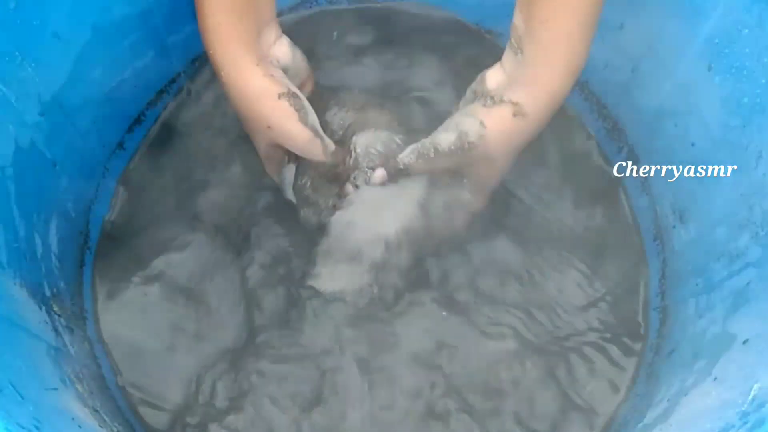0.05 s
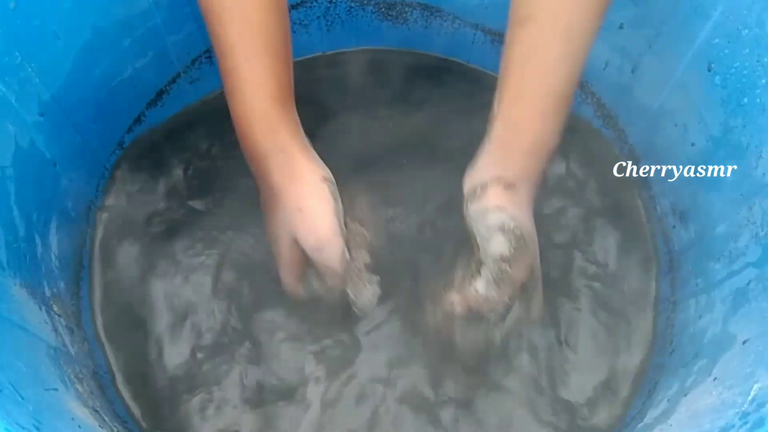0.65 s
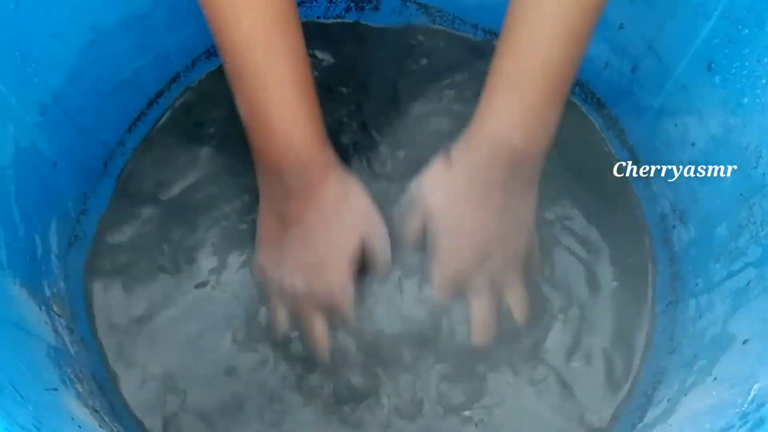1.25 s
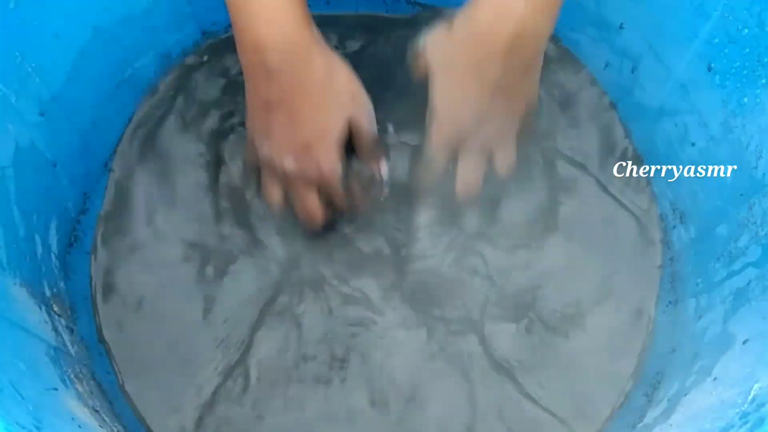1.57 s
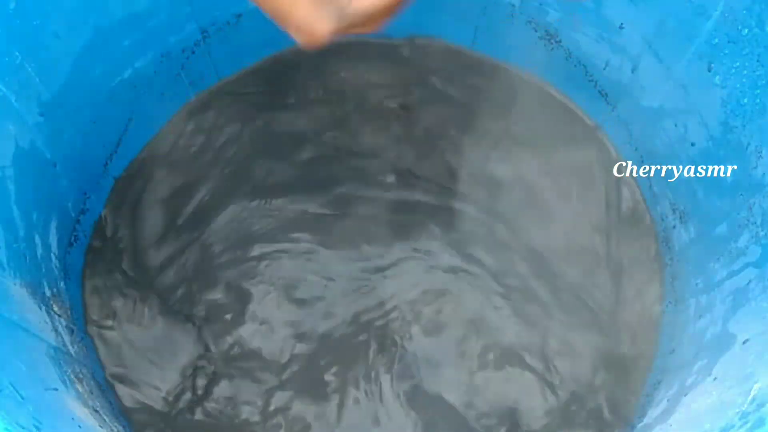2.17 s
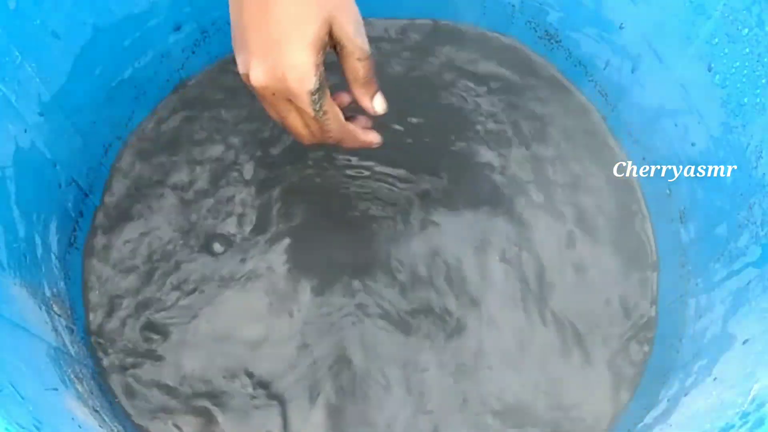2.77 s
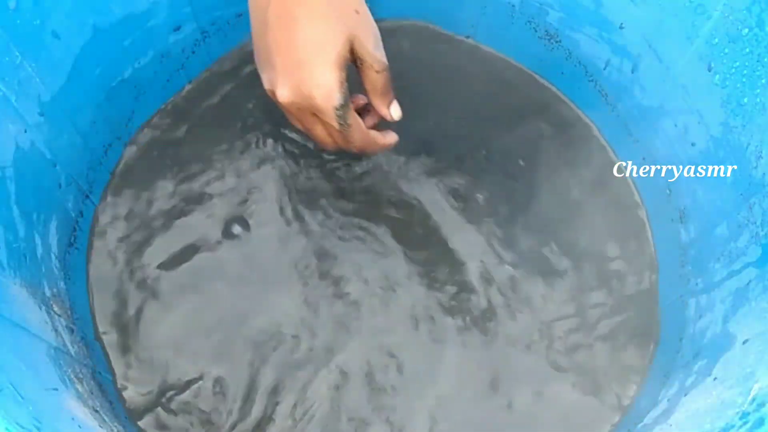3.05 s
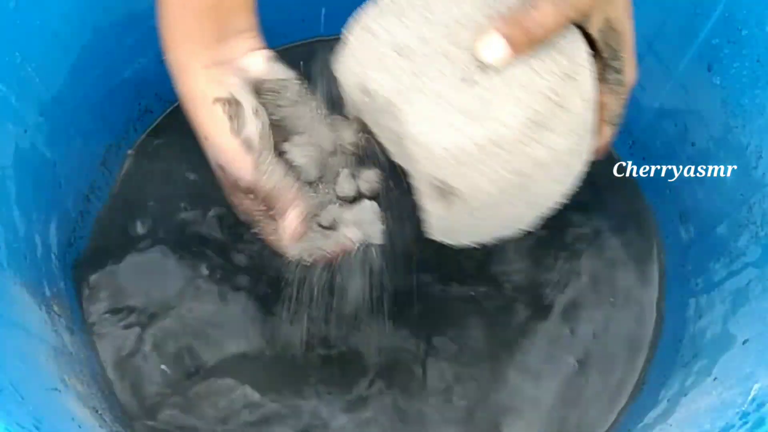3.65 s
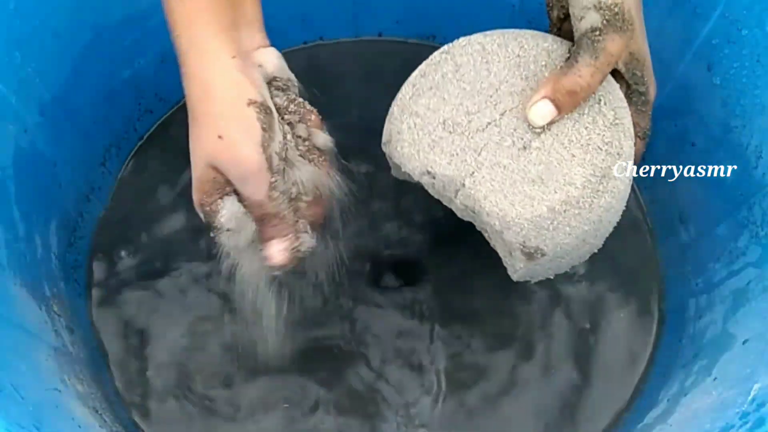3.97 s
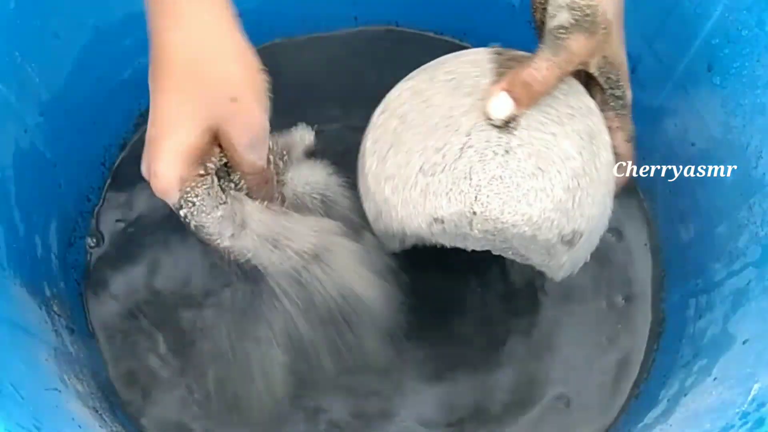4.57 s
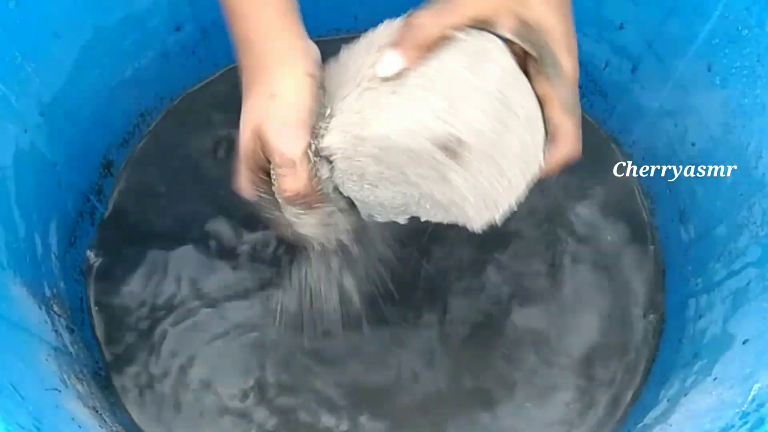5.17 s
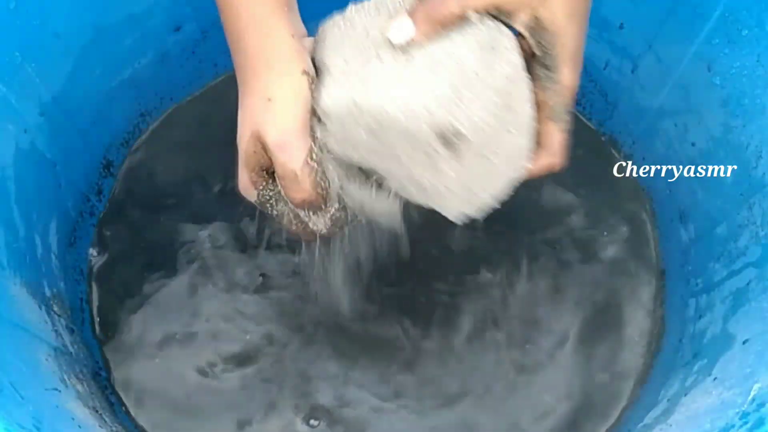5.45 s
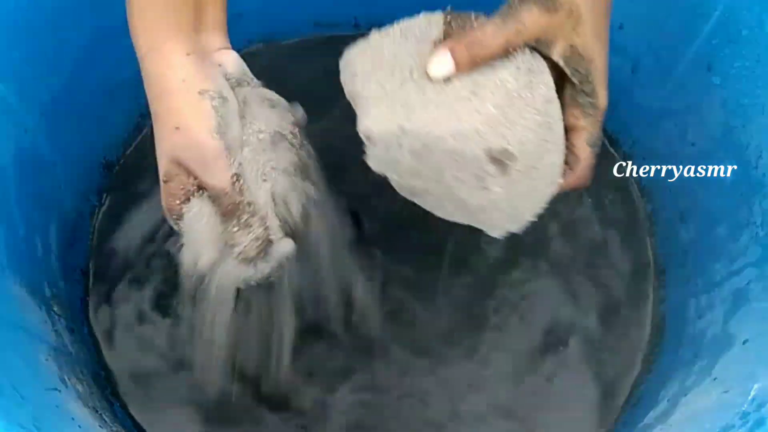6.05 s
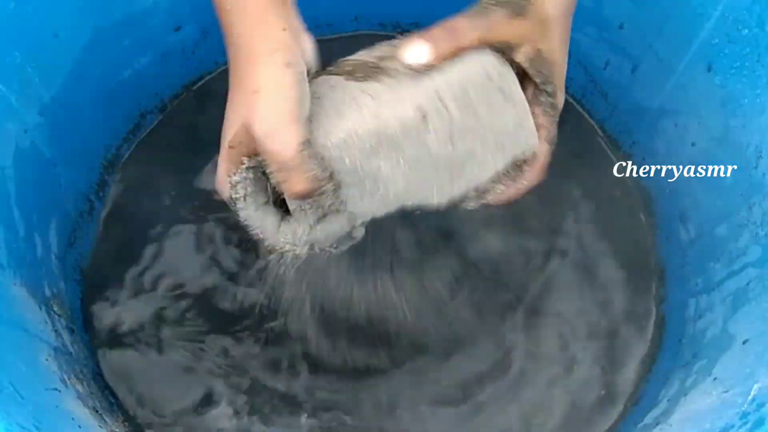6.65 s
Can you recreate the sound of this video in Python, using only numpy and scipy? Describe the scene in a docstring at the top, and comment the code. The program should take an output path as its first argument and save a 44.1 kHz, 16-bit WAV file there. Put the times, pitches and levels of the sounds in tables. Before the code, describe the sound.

Hands crumble soft, sandy cement into a plastic tub of water outdoors, close to the microphone. Sand patters on the surface, lumps plop in with ringing bubbles, and sunken crumbs fizz. Wet hands drip, then there is a short lull. A bigger piece plunges in with a splash and gulp, followed by more hissing trickles of sand and scattered plops. A low, distant rumble runs underneath.

```python
"""Outdoors in a yard, one microphone close to a plastic tub; hands crumble soft, sandy cement over the water.
First sand patters on the surface, sunken crumbs fizz as their air escapes, and lumps smack in and trap
ringing bubbles. Around 2 s the wet hands lift out and drip. After a lull with a faint high tone, a thumb
rubs off more sand and a corner plunges in at 3.5 s. A far motor swells and fades while sand and lumps
keep falling. A low, distant rumble lies under it all."""
import sys
import numpy as np
from scipy import signal
from scipy.io import wavfile
from scipy.ndimage import uniform_filter1d

SR = 44100
rng = np.random.default_rng(int(sys.argv[2]) if len(sys.argv) > 2 else 0)


def transcribe(u):
    """Save the signal u as a 16-bit wav file named by the first command-line argument.

    u: samples, shape (n,) or (channels, n), limited to [-1, 1]; the rate is SR.
    q: integer samples, one column per channel.
    """
    v = np.clip(np.atleast_2d(u).T, -1, 1)
    q = np.round(v * 32767).astype(np.int16)
    wavfile.write(sys.argv[1], SR, q)


N = 300762
TIME = np.arange(N) / SR

# air trapped under the surface: t/s, level/dB, f/Hz, pitch rise/(share per 10 ms)
TRAPPED_BUBBLES = [(.2472, -21.5, 964, 0.28), (0.6551, -25.5, 1610, 0.51), (.8672, -24.5, 2060, 0),
                   (.871, -14, 672, 0.015), (.881, -25, 2980, 0.12), (.9043, -31.5, 964, 0),
                   (0.9734, -16, 1380, 0.014), (0.982, -36, 1980, 0.049), (1.085, -7.5, 653, 0.71),
                   (1.121, -13.5, 687, 0.66), (1.2086, -21.5, 2120, .15), (1.443, -17.5, 991, 0.0075),
                   (1.454, -35, 2900, 0.16), (2.015, -29, 980, 0.078), (2.157, -24.5, 9400, 0),
                   (2.1822, -16.5, 1180, 0.17), (2.1884, -28.5, 1515, 0), (2.541, -32, 1860, 0.046),
                   (2.547, -35.5, 628, 0), (2.581, -28.5, 1520, 0.15), (2.626, -20.5, 927, 0.0027),
                   (2.645, -34.5, 2450, .15), (3.4848, -12.5, 903, 0.046), (3.4961, -10.5, 900, 0.098),
                   (3.5015, -22, 810, 0.54), (3.5147, -15, 1140, 0.21), (3.5177, -17.5, 790, .4),
                   (3.536, -20, 980, 0.012), (3.5737, -27, 990, 0.03), (3.7043, -18.5, 661, 0),
                   (3.715, -33.5, 1870, 0.0028), (4.158, -16, 1450, 0.1), (4.412, -26.5, 1086, 0.085),
                   (4.8461, -31, 1130, 0), (4.966, -34, 1860, 0), (5.8271, -27, 1190, 0.019),
                   (5.8873, -23.5, 963, .45), (5.9183, -24.5, 960, 0)]
# small hard crumbs plinking in, too briefly to sing: t/s, level/dB, f/Hz
CRUMB_PLINKS = [(.807, -26, 1050), (0.8541, -18.5, 1990), (1.0677, -16, 4000), (1.0721, -16, 5200),
                (1.882, -32, 7050), (1.937, -28, 2140), (2.465, -33.5, 4000), (2.519, -23, 8800),
                (3.5485, -20.5, 2211), (4.317, -23, 1930), (4.375, -27.5, 2640), (4.5513, -21, 10700),
                (4.596, -21, 980), (4.804, -23, 2380), (5.3, -29, 2916), (5.4013, -26, 1800),
                (5.413, -26.5, 2150), (5.781, -26.5, 1470), (5.7977, -21, 1950), (5.838, -24.5, 1650),
                (5.93, -25.5, 2298), (6.0135, -24, 1060), (6.072, -33, 2580), (6.0858, -28, 3660),
                (6.2673, -21, 2080), (6.372, -30, 1100), (6.431, -22, 1220), (6.449, -28, 935),
                (6.4738, -27, 1060), (6.598, -27, 1660)]
# lumps hitting the surface: t/s, level/dB, treble tilt/dB
LUMP_SMACKS = [(.681, -30, 17), (0.7038, -25, 10), (.8136, -27, 18), (.856, -24.5, -11), (0.8707, -14, -14),
               (0.941, -32.5, 19), (1.0832, -13.5, -23), (1.1198, -19.5, -18), (1.166, -27.5, 10),
               (1.1967, -21, 11), (1.4308, -22.5, -37), (2.048, -31.5, 34), (3.5481, -28, -20),
               (3.574, -24.5, -8), (3.6079, -25, 12), (3.612, -11, -57), (3.7035, -21.5, -34),
               (4.1592, -17, -25), (4.3452, -13, -67), (4.4113, -19.5, -4), (4.5512, -24, 25),
               (4.8458, -27.5, -5), (5.825, -26, 9), (5.887, -27, -19), (5.9174, -31.5, -5),
               (6.1916, -26, -62)]
# cavities opened by big lumps: t/s, level/dB, f/Hz
CAVITY_GULPS = [(.872, -35, 488), (1.0846, -12.5, 422), (3.502, -23, 330), (3.613, -9.5, 404),
                (4.3458, -13.5, 547), (4.412, -17.5, 440), (6.133, -21, 422), (6.191, -21.5, 306)]
# spurts of sand thumbed off the block: t/s, length/s, level/dB
THUMB_RUBS = [(3.301, 0.043, -54.5), (3.432, 0.07, -47), (4.665, 0.096, -57.5), (4.939, 0.026, -60.5),
              (5.179, 0.037, -55), (5.297, 0.061, -57.5), (5.455, .075, -52), (5.594, 0.064, -51),
              (6.616, 0.018, -54), (6.73, .055, -58)]
# sand streaming from opening hands, or trickling between handfuls: t/s, length/s, build-up/s, level/dB
SAND_POURS = [(-.1, 2.36, 0.092, -68.5), (0.233, .62, 0.21, -58.5), (3.21, 3.4, 0.12, -68),
              (3.8, 0.57, 0.37, -54.5), (5.295, 0.51, 0.28, -58), (6.09, 0.35, 0.079, -54)]
# clouds of air from sunken handfuls: t/s, length/s, level/dB, settled f/Hz
AIR_CLOUDS = [(-.15, 0.58, -39.5, 846), (0.26, 0.55, -39, 1500), (1.162, 0.93, -31.5, 770)]
# a far motor: t/s, level/dB, f/Hz
FAR_MOTOR = [(3.8, -50, 221.6), (4.1, -76, 225), (4.45, -50, 234), (4.8, -44.5, 234.6), (5.25, -52, 226.8),
             (5.7, -65, 221)]
# a faint, thin high tone: t/s, level/dB, f/Hz
THIN_TONE = [(2.28, -82, 3510), (2.34, -72, 3570), (3.1, -83, 3530), (3.25, -80, 3540)]

# spectra of the sounds in the tub and of the distant rumble: f/Hz, relative level/dB
SMACK_SPECTRUM = [(200, -10), (700, 7), (1800, 10), (4000, -2), (6500, -4), (10000, -5), (16000, -21.5)]
HISS_SPECTRUM = [(1500, -21), (2700, -14), (4200, -8), (5500, 0), (7500, 3.5), (9300, -1), (10300, -5),
                 (13000, -12), (16000, -26)]
PATTER_SPECTRUM = [(250, -31.5), (450, -9.5), (600, 4.5), (770, -9.5), (1000, 2.5), (1250, -2.5),
                   (1650, -0.5), (2200, -0.5), (3000, -4), (4300, -15), (7000, -42)]
FIZZ_SPECTRUM = [(200, -25), (380, 2), (480, -2), (620, -0.5), (770, -8.5), (980, -2.5), (1170, -4.5),
                 (1450, -2.5), (1750, -4), (2100, -3), (3200, -8), (5000, -20), (10000, -46)]
PLUNGE_SPECTRUM = [(30, -42), (60, 7), (130, -32), (300, 4), (450, -2.5), (680, -5), (950, -2.5),
                   (1300, 1.5), (1700, -10), (2200, -12.5), (4500, -22.5), (9000, -45), (15000, -37)]
RUMBLE_SPECTRUM = [(22, -44), (35, -8), (50, -3), (75, 3), (120, -2.5), (220, -5.5), (310, -11), (420, -21),
                   (720, -29), (1000, -25), (2000, -37.5), (4500, -45), (9000, -39.5), (15500, -53.5)]
# ring time of the tub and yard: f/Hz, T60/s
YARD_DECAY = [(200, 0.067), (1000, 0.059), (3000, 0.015), (12000, 0.041)]
# echoes off the tub wall and the ground: delay/s, linear gain
NEAR_ECHOES = [(.0021, 0.13), (.0041, 0.11), (.0068, .12)]


def bubbles():
    """Trapped air rings after a small splash; a bubble that climbs is near the surface and dies sooner."""
    out, t = np.zeros(N), np.arange(SR // 25) / SR
    deep_cycles, surface_damping = 8, 3.6
    crumb_cycles, crumb_rise = 2.9, 0.03
    singing = [(s, db, hz, rise, deep_cycles / (1 + surface_damping * abs(rise)))
               for s, db, hz, rise in TRAPPED_BUBBLES]
    plinking = [(s, db, hz, crumb_rise, crumb_cycles) for s, db, hz in CRUMB_PLINKS]
    for s, db, hz, rise, cycles in singing + plinking:
        splash = unit_rms(coloured(rng.standard_normal(len(t)), PATTER_SPECTRUM)) * np.exp(-t / 0.01)
        add(out, s, gain_of(db) * ring(hz, cycles / hz, rise, attack_s=0.0001))
        add(out, s, gain_of(db - 23.5) * splash)
    return out


def lumps():
    """Each lump smacks the surface and throws droplets that fall back as tiny bubbles; big ones gulp."""
    out, t = np.zeros(N), np.arange(SR // 25) / SR
    for s, db, tilt_db in LUMP_SMACKS:
        blow = (t == 0) + 0.27 * rng.standard_normal(len(t)) * np.exp(-t / 0.002)
        tilted = [(hz, band_db + tilt_db * hz / (hz + 6000)) for hz, band_db in SMACK_SPECTRUM]
        smack = coloured(blow, tilted)
        add(out, s, gain_of(db + 1) * smack / abs(smack).max())
        for flight, pitch, force in rng.random(size=(6, 3)):
            hz = 2000 * 2 ** (1.72 * pitch)
            droplet = gain_of(db - 22) * force * ring(hz, life_s=6 / hz, rise=0.12)
            add(out, s + 0.0039 + 0.037 * flight ** 2, droplet)
    for s, db, hz in CAVITY_GULPS:
        add(out, s, gain_of(db) * ring(hz, life_s=0.0031, rise=0.039, attack_s=0.002))
    return out


def plunge():
    """A broken-off corner goes in at once: a shower of coarse crumbs churns the water."""
    churn = unit_rms(coloured(impacts(per_s=2600, spread_db=12), PLUNGE_SPECTRUM))
    return gain_of(-26.5) * churn * swell(start_s=3.452, length_s=0.048, attack_s=0.015, release_s=0.044)


def sand_flow():
    """How much sand is falling: short spurts from the thumb on top of longer streams."""
    rubs = [gain_of(db) * swell(s, length, attack_s=0.021, release_s=0.038)
            for s, length, db in THUMB_RUBS]
    pours = [gain_of(db) * swell(s, length, build, release_s=0.11) for s, length, build, db in SAND_POURS]
    return power_sum(rubs + pours)


def sand():
    """Grains hiss on the surface and leave a dense patter of tiny bubbles, both following the flow."""
    hiss = unit_rms(coloured(impacts(per_s=3800, spread_db=2.5), HISS_SPECTRUM))
    pings = sum(sound for _, sound in swarm(412, 4900, per_s=11000, spread_db=2.5, cycles=5.5))
    patter = unit_rms(coloured(pings, PATTER_SPECTRUM))
    flicker = gain_of(0.5 + 2.55 * wander(per_s=65))
    return sand_flow() * (flicker * hiss + gain_of(5) * patter)


def fizz():
    """Air wells up from sunken crumbs; the smallest bubbles escape first, so the pitch starts high."""
    fade_db_per_s, settle_s, start_octaves, width_octaves = 24, 0.045, 0.8, 0.71
    envelopes, octaves = [], []
    for s, length, db, hz in AIR_CLOUDS:
        age = np.maximum(TIME - s, 0)
        welling = swell(s, length, attack_s=0.19, release_s=0.063)
        envelopes.append(gain_of(db - fade_db_per_s * age) * welling)
        octaves.append(np.log2(hz) + start_octaves * np.exp(-age / settle_s))
    centre = np.average(octaves, axis=0, weights=np.square(envelopes) + 1e-20)
    sizes = swarm(345, 5120, per_s=5000, spread_db=1, cycles=2.3)
    cloud = sum(sound / (1 + ((np.log2(hz) - centre) / width_octaves) ** 2) for hz, sound in sizes)
    return unit_rms(coloured(cloud, FIZZ_SPECTRUM)) * power_sum(envelopes)


def drips():
    """Spray, drips from the lifted hands and stray crumbs each pinch off a small, short-lived bubble."""
    spray = [gain_of(db - 44) * swell(s, length_s=0.053, attack_s=0.053, release_s=0.053)
             for s, db, _ in LUMP_SMACKS]
    hands = gain_of(-63) * swell(start_s=1.897, length_s=0.78, attack_s=0.048, release_s=0.067)
    strays = gain_of(-5.5) * sand_flow()
    sizes = swarm(1140, 4840, per_s=69, spread_db=0.5, cycles=5.5, count=20)
    plinks = unit_rms(sum(sound / hz ** 1.09 for hz, sound in sizes))
    return power_sum(spray + [hands, strays]) * plinks


def foam():
    """Foam left by the churning hands bursts at the surface in a fine, fading crackle."""
    sizes = swarm(5000, 13300, per_s=130, spread_db=5.5, cycles=3.6, count=10)
    ticks = unit_rms(sum(sound / hz for hz, sound in sizes))
    fade = gain_of(-62.5 - 5.5 * TIME)
    return ticks * fade * swell(start_s=0.22, length_s=2.43, attack_s=0.062, release_s=0.1)


def yard(x):
    """The microphone hears the direct sound, close echoes off tub and ground, and a short, weak tail."""
    t = np.arange(SR // 4) / SR
    scatter = rng.standard_normal(len(t)) * (rng.random(len(t)) < 0.1) * (t > 0.004)
    hz, age, bands = signal.stft(scatter, SR, nperseg=256)
    decay = np.exp(-np.log(1000) * age / at_frequency(YARD_DECAY, hz)[:, None])
    tail = signal.istft(bands * decay, SR)[1]
    response = gain_of(-14.5) * tail / np.linalg.norm(tail)
    direct = (0.00023, 1)
    for delay, gain in [direct] + NEAR_ECHOES:
        add(response, delay, np.array([gain]))
    return signal.oaconvolve(x, response)[:N]


def faint_tone(rows, waver, flutter_db):
    """A sine that swells and fades along its rows, unsteady in pitch and level."""
    times, db, hz = np.transpose(rows)
    gate = uniform_filter1d(((TIME >= times[0]) & (TIME <= times[-1])) * 1.0, size=600)
    pitch = np.interp(TIME, times, hz) * (1 + waver * wander(per_s=70))
    level_db = np.interp(TIME, times, db) + flutter_db * wander(per_s=20)
    return gate * gain_of(level_db) * np.sin(2 * np.pi * np.cumsum(pitch) / SR)


def background():
    """Far from the tub: a low rumble, a motor and a thin high tone."""
    drift = gain_of(-42.5 + 1.44 * wander(per_s=6.1))
    rumble = drift * unit_rms(coloured(rng.standard_normal(N), RUMBLE_SPECTRUM))
    motor = faint_tone(FAR_MOTOR, waver=0.025, flutter_db=3.5)
    whine = faint_tone(THIN_TONE, waver=0.006, flutter_db=2.5)
    return rumble + motor + whine


def ring(hz, life_s, rise, attack_s=0.00096):
    """One bubble: a dying sine that climbs for up to 20 ms as it nears the surface."""
    t = np.arange(SR // 20) / SR
    glide = 1 + rise * np.minimum(t / 0.01, 2)
    envelope = np.exp(-(t / life_s) ** 1.5) * (1 - np.exp(-t / attack_s))
    return envelope * np.sin(2 * np.pi * np.cumsum(hz * glide) / SR)


def swarm(lo_hz, hi_hz, per_s, spread_db, cycles, count=40):
    """Yields (pitch, sound) for each size of bubble in a swarm ringing at random times."""
    for hz in np.geomspace(lo_hz, hi_hz, count) * rng.uniform(0.932, 1.03, count):
        births = impacts(per_s / count, spread_db)
        pings = signal.oaconvolve(births, ring(hz, cycles / hz, rise=rng.uniform(0, 0.1)))[:N]
        yield hz, unit_rms(pings) * np.sqrt(hz)


def impacts(per_s, spread_db):
    """A random train of clicks: many small, a few large."""
    size = gain_of(spread_db * np.minimum(rng.exponential(1, N), 4))
    return size * rng.choice([-1, 1], N) * (rng.random(N) < per_s / SR)


def swell(start_s, length_s, attack_s, release_s):
    """An envelope that builds up, holds until its length is over, then dies away."""
    age = TIME - start_s
    return np.clip(age / attack_s, 0, 1) * np.exp(-np.maximum(age - length_s, 0) / release_s)


def wander(per_s):
    """Random drift of about unit size."""
    knots = rng.standard_normal(4096)
    return np.interp(TIME * per_s, np.arange(len(knots)), knots)


def coloured(x, spectrum):
    """Minimum-phase filter with the given spectrum, so that clicks keep their sharp fronts."""
    hz = abs(np.fft.fftfreq(8192, 1 / SR))
    log_gain = np.log(gain_of(at_frequency(spectrum, hz)))
    taps = np.fft.ifft(np.exp(np.conj(signal.hilbert(log_gain)))).real
    return signal.oaconvolve(x, taps[:len(taps) // 2])[:len(x)]


def at_frequency(rows, hz):
    """Interpolates a table on a log-frequency axis."""
    f, value = np.transpose(rows)
    return np.interp(np.log(hz + 1), np.log(f), value)


def power_sum(envelopes):
    """Joint level of independent sounds: their powers add."""
    return np.sqrt(sum(envelope ** 2 for envelope in envelopes))


def gain_of(db):
    """Decibels to amplitude."""
    return 10 ** (np.asarray(db) / 20)


def unit_rms(x):
    """Scales to an rms of one."""
    return x / np.sqrt(np.mean(x ** 2) + 1e-20)


def add(mix, start_s, sound):
    """Mixes a sound in at a time."""
    part = mix[max(round(start_s * SR), 0):][:len(sound)]
    part += sound[:len(part)]


def scene():
    """The tub close up in its yard, the background far off, in mono."""
    tub = bubbles() + lumps() + sand() + drips() + fizz() + foam() + plunge()
    return (yard(tub) + background())[None]


def record(dry):
    """The microphone's low cut and the recorder's band limit."""
    low_cut_hz, band_limit_hz = 30.4, 15800
    low_cut = signal.butter(4, low_cut_hz, "high", fs=SR, output="sos")
    band_limit = signal.firwin(401, band_limit_hz, window=("kaiser", 9), fs=SR)
    return signal.oaconvolve(signal.sosfilt(low_cut, dry), band_limit[None], "same")


dry = scene()
out = record(dry)
transcribe(out)
```